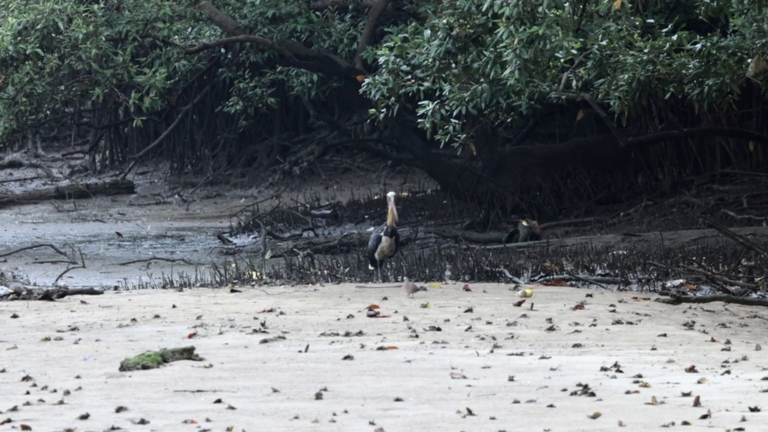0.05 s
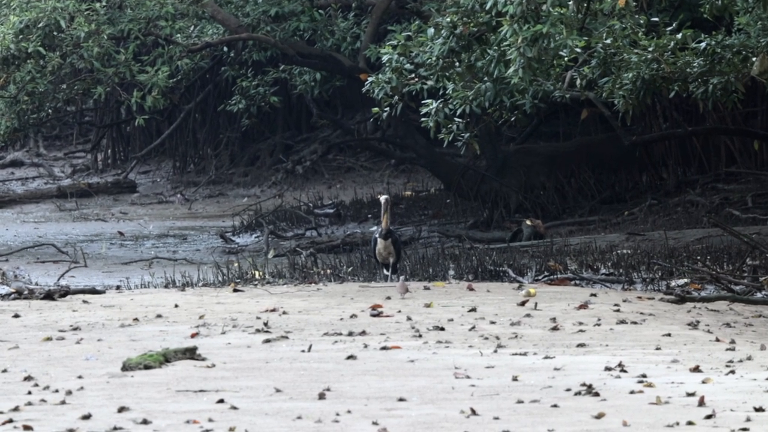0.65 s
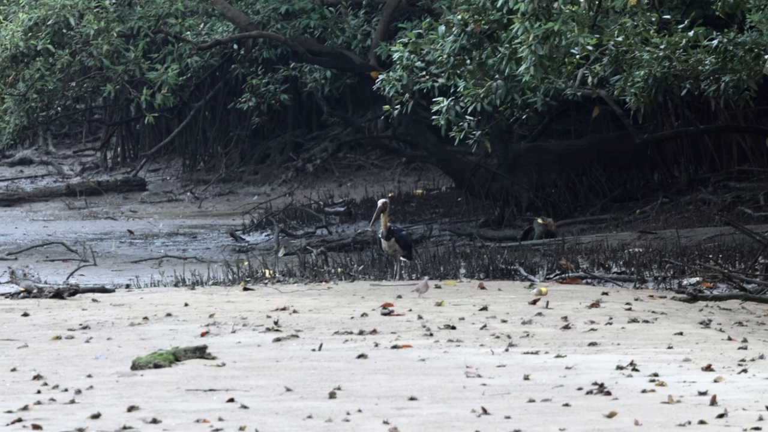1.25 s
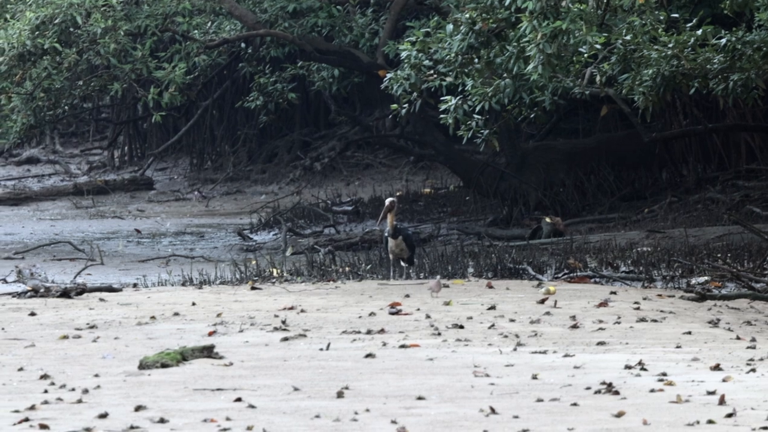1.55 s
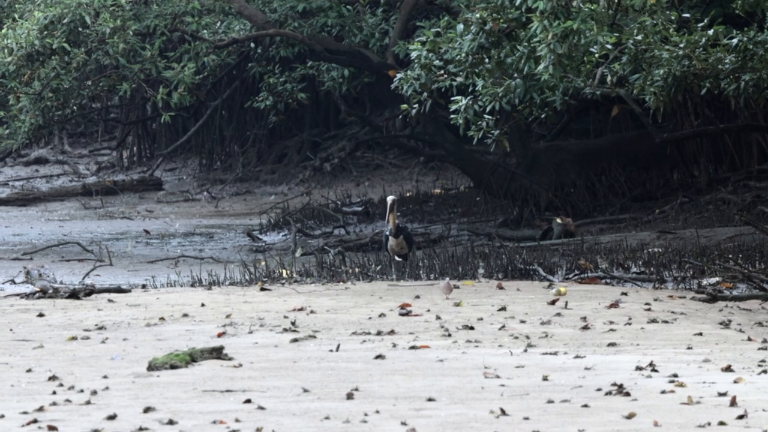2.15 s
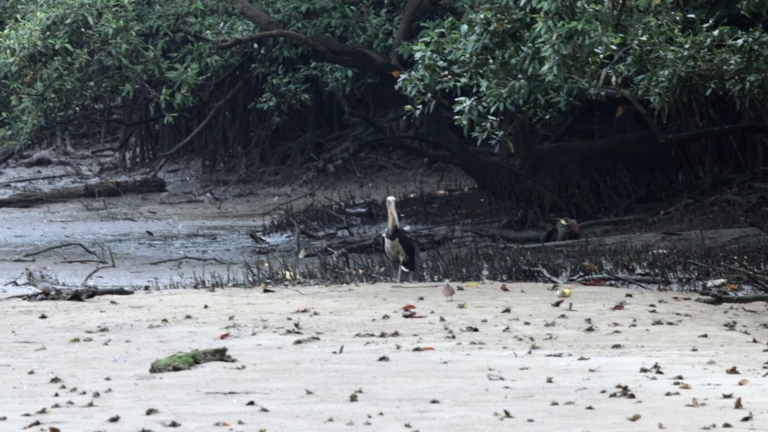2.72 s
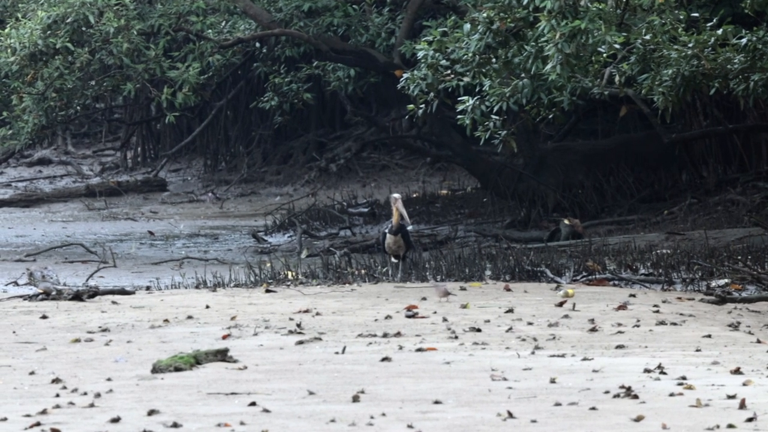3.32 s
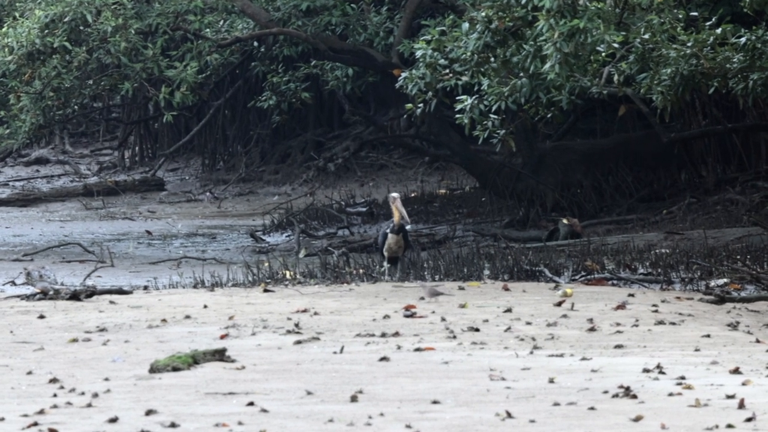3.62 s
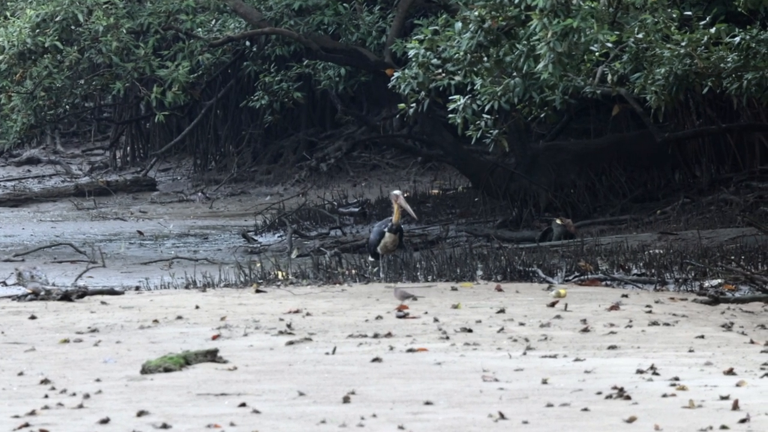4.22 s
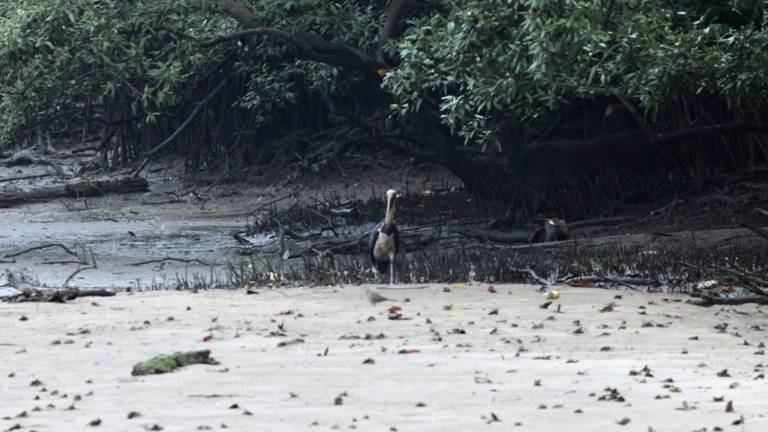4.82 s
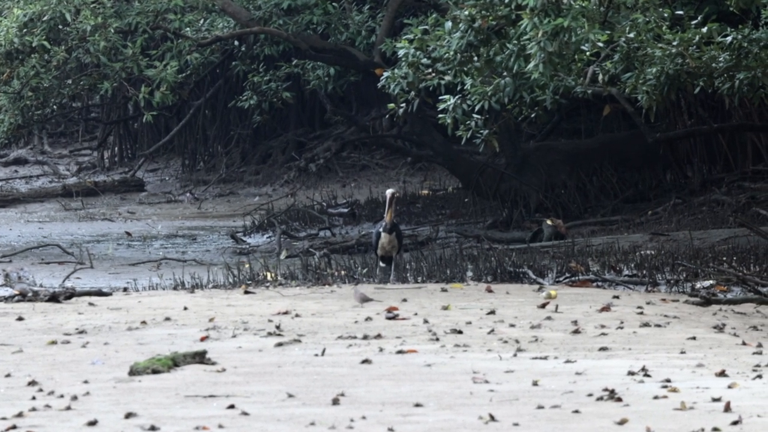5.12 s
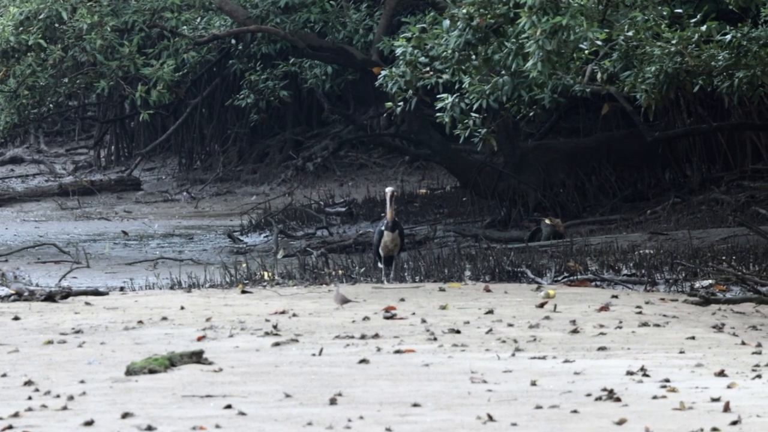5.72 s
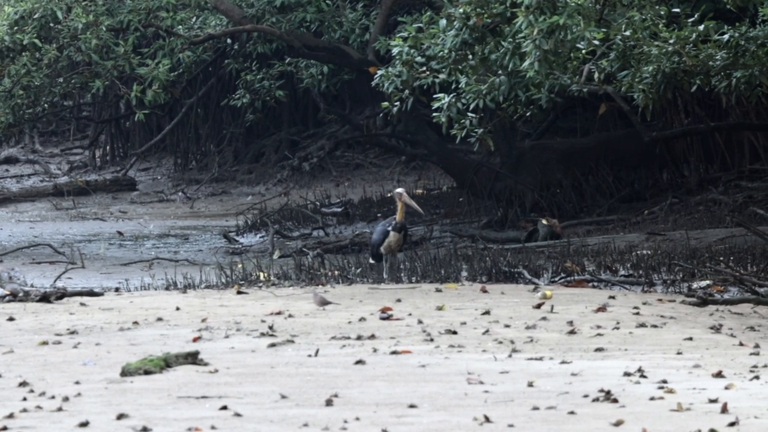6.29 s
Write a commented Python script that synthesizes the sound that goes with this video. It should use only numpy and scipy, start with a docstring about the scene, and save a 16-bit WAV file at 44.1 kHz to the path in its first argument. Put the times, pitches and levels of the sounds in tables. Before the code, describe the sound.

A quiet wooded shore is heard throughout: a soft, low, distant rumble, a light forest hush and a thin, high insect hiss. At about 0.6 and 1.5 seconds a crow caws, by far the loudest sound. Each caw lasts just under half a second, is harsh and rattling, rises slightly and sags at the end, with a short echo from the trees. A dry twig snaps at about 1.2 seconds and again near 3.4, with a few fainter ticks around them. Small birds keep up faint chirps, pips, high twitters and short falling whistles, busiest between 2 and 5 seconds, while farther insects swell and fade softly. One faint falling whistle lingers in the forest at about 4.3 seconds. The crow returns with two more harsh caws at about 5.4 and 6.1 seconds, the last ending near 6.6.

```python
"""Small birds, thin insects and a soft far rumble open the scene; then a crow caws four times.
Each caw is a tone that arches up to about 900 Hz and flutters about 80 times a second. It swoops down
in every pulse of the bird's voice box, so its overtones sweep through the throat's resonances (the
pitches at which the throat rings). Twigs snap, and the trees of this mangrove shore echo the calls."""
import sys
import numpy as np
from scipy import signal
from scipy.fft import rfft, irfft
from scipy.io import wavfile

SR = 44100
rng = np.random.default_rng(int(sys.argv[2]) if len(sys.argv) > 2 else 0)


def master(y):
    """Save y as 16-bit WAV."""
    cut = np.clip(np.atleast_2d(y).T, -1, 1)
    pcm = np.round(cut * 32767)  # scale
    wavfile.write(sys.argv[1], SR, pcm.astype(np.int16))


N = 288855
FOREST_T60_S = 0.87   # time for the forest echo to fade by 60 dB
COLLAPSE_S = .125   # the crow's breath gives out over this last part of a caw


def from_db(db):
    """Turn decibels into a gain."""
    return 10 ** (np.asarray(db) / 20)


def rms_one(x):
    """Scale a sound to an average power of 1."""
    return x / np.sqrt(np.mean(x ** 2) + 1e-20)


def ramp(t, length):
    """Fall from 1 at time 0 to 0 after the given length."""
    return np.clip(1 - t / length, 0, 1)


def response(points, hz):
    """Look up the gain at each frequency on a curve of (frequency, level/dB) points."""
    where, db = np.transpose(points)
    return from_db(np.interp(np.log(hz + 1e-9), np.log(where), db))


def colour(x, points):
    """Shape a sound's lows and highs with such a curve; power 1."""
    gain = response(points, np.fft.rfftfreq(len(x), 1 / SR))
    return rms_one(irfft(rfft(x) * gain, len(x)))


def band(x, low_hz, high_hz, order=2):
    """Keep what lies between two frequencies."""
    sos = signal.butter(order, [low_hz, min(high_hz, SR / 2 - 1)], "band", fs=SR, output="sos")
    return signal.sosfilt(sos, x)


def wander(rate, count):
    """Drift at random, heading for a new value rate times a second."""
    at = np.arange(count) * rate / SR
    steps = int(at[-1]) + 2
    return np.interp(at, np.arange(steps), rng.standard_normal(steps))


def even(x):
    """Hold the power steady over a few pulses, keeping the pulses themselves."""
    window = np.hanning(SR // 22)
    power = signal.fftconvolve(x * x, window / window.sum(), "same")
    return x / np.sqrt(np.abs(power) + 1e-12)


def resonate(x, hz, width_hz):
    """Ring like a hollow space, at a pitch that may move."""
    carrier = np.exp(2j * np.pi * np.cumsum(hz) / SR)
    decay = np.exp(-np.pi * width_hz / SR)
    return 2 * np.real(carrier * signal.lfilter([1 - decay], [1, -decay], x / carrier))


def add(out, start, sound):
    """Mix a sound in at a start time in seconds."""
    i = max(int(start * SR), 0)
    out[i:i + len(sound)] += sound[:N - i]


def trees(x, t60, delay):
    """Countless small echoes from trunks and leaves build up and die away."""
    t = np.arange(SR) / SR
    build_up = 1 - np.exp(-(t / delay) ** 2)
    echoes = rng.standard_normal(SR) * from_db(-60 * t / t60) * build_up
    return signal.fftconvolve(x, echoes / np.linalg.norm(echoes))[:N]


def shore(chorus_half_width_hz=280):
    """Far rumble, forest hush and two insect choruses, all shaped from noise."""
    # tone colours of the three steady sounds: f/Hz, relative level/dB
    rumble_colour = [(15, -35), (25, -30.5), (34, -14.5), (72, -0.5), (118, -1.5), (165, -1), (233, -1.5),
                     (324, -5.5), (382, -10.5), (466, -11.5), (818, -19.5), (1300, -24), (1690, -50.5),
                     (2860, -120)]
    hush_colour = [(900, -29), (1400, 3.5), (2200, 1), (3300, 6.5), (4300, -2.5), (5500, -8), (7000, -4),
                   (8500, -16), (10000, -20.5), (15500, -30)]
    insect_colour = [(6900, -42), (7250, -9.5), (7500, -1), (7850, -3.5), (8050, -5.5), (8300, -36.5)]
    # farther insects swell and fade: t/s, length/s, f/Hz, level/dB at the top of the swell
    swells = [(1.349, 1.08, 4200, -57.5), (2.199, 1.1, 3950, -57.5), (3.0, 1.1, 3980, -55.5),
              (5.052, 1.1, 4200, -62)]
    rumble = from_db(-44 + wander(5.38, N)) * colour(rng.standard_normal(N), rumble_colour)
    hush = from_db(-55 + .5 * wander(5, N)) * colour(rng.standard_normal(N), hush_colour)
    insects = from_db(-56 + .76 * wander(40, N)) * colour(rng.standard_normal(N), insect_colour)
    chorus = np.zeros(N)
    for start, length, hz, db in swells:
        swell = signal.windows.hann(int(length * SR))
        noise = rng.standard_normal(len(swell))
        buzz = rms_one(band(noise, hz - chorus_half_width_hz, hz + chorus_half_width_hz))
        add(chorus, start, from_db(db) * swell * buzz)
    return rumble + hush + insects + chorus


def far_rasps_and_echo(spread=0.052):
    """Distant rasps and one whistle's lingering echo, each a narrow band of noise."""
    # noise bands: t/s, length/s, f/Hz, relative level/dB
    # the long one at 4.3 s, near 2.6 kHz, is the lingering forest echo of a sagging whistle
    noise_bands = [(0, 0.17, 3440, -51), (2.277, 0.15, 4920, -58.5), (2.515, .14, 6200, -64),
                   (2.67, 0.11, 5940, -54), (2.832, 0.24, 4900, -61), (3.099, 0.031, 4850, -49.5),
                   (3.26, .04, 6500, -58), (3.508, 0.18, 4900, -65), (3.662, 0.081, 5970, -60),
                   (3.839, 0.08, 5800, -53), (4.14, 0.061, 6500, -61), (4.307, 0.61, 2630, -58),
                   (5.08, .03, 6100, -53), (5.21, 0.038, 6100, -56)]
    out = np.zeros(N)
    for start, length, hz, db in noise_bands:
        swell = signal.windows.tukey(int(length * SR), .5)
        hiss = band(rng.standard_normal(len(swell)), hz * (1 - spread), hz * (1 + spread))
        add(out, start, from_db(db - 3.5) * rms_one(swell * hiss))
    return out + from_db(-2.5) * trees(out, FOREST_T60_S, delay=0.023)


def twigs(t60=0.012):
    """Each dry snap is a burst of noise that dies almost at once."""
    # snaps: t/s, peak level/dB, f/Hz
    snaps = [(1.205, -32, 3000), (2.051, -46, 9000), (2.917, -50, 8000), (3.373, -42, 5000),
             (3.427, -31.5, 1970)]
    out, t = np.zeros(N), np.arange(SR // 20) / SR
    for start, db, hz in snaps:
        snap = band(rng.standard_normal(len(t)) * from_db(-60 * t / t60), hz / 3, hz * 2)
        add(out, start, from_db(db) * snap / np.abs(snap).max())
    return out


def whistle(length, start_hz, middle_hz, end_hz, waver):
    """A nearly pure tone glides along an arc, swells, fades and flickers through the leaves."""
    progress = np.linspace(0, 1, int(length * SR))
    arc = np.polyval(np.polyfit([0, .5, 1], [start_hz, middle_hz, end_hz], 2), progress)
    pitch = arc * (1 + waver * wander(202.5, len(arc)))
    swell = np.abs(np.sin(np.pi * progress)) ** .5
    flicker = from_db(1.57 * wander(120, len(arc)))
    return rms_one(np.sin(2 * np.pi * np.cumsum(pitch) / SR) * swell * flicker)


def small_birds(pip_hz=1480, pip_s=0.012):
    """Whistles, chirps and pips; the deeper in the trees, the more echo."""
    # notes, one table for each kind: t/s, length/s, middle f/Hz, relative level/dB
    slurs = [(1.0, 0.063, 3150, -47.5), (2.07, .052, 3074, -47), (2.35, .04, 2700, -49),
             (2.91, .052, 2894, -46.5), (3.075, .06, 2945, -48.5), (3.605, .035, 2814, -50.5),
             (4.085, 0.049, 2900, -44.5), (5.075, 0.05, 2970, -48), (6.065, 0.049, 2905, -46.5)]
    flicks = [(2.86, .029, 2340, -48.5), (3.545, 0.029, 2350, -49.5), (6.01, .038, 2400, -53)]
    dips = [(4.025, .036, 1920, -53.5), (5.02, .037, 1940, -54.5)]
    arches = [(.16, 0.069, 2760, -47.5), (.33, .11, 2405, -49), (1.33, .065, 2284, -49.5),
              (5.26, 0.12, 1830, -59)]
    chirps = [(.324, 0.046, 3030, -57), (.45, 0.043, 3050, -59), (.575, .045, 3040, -58),
              (1.19, .045, 3004, -55), (1.32, 0.037, 2970, -59), (1.44, .052, 2980, -57)]
    long_notes = [(1.84, .23, 3280, -55.5), (2.897, 0.14, 3430, -53), (3.88, 0.23, 3270, -57),
                  (4.45, 0.36, 3080, -56), (4.76, .26, 3220, -58), (5.83, .22, 3210, -60)]
    sagging_notes = [(3.585, 0.069, 3240, -48), (3.78, 0.089, 3024, -47), (4.27, .21, 2740, -51.5)]
    thin_falls = [(.08, .059, 6730, -56), (4.5, 0.055, 6900, -53), (4.67, 0.13, 4570, -64)]
    twitters = [(1.18, 0.066, 9360, -62), (1.36, 0.061, 9170, -60), (1.75, 0.062, 9140, -59),
                (1.97, .087, 9110, -60), (2.16, 0.075, 9120, -59.5), (2.36, .088, 9440, -60),
                (2.58, 0.1, 9070, -60), (2.8, 0.057, 8800, -58.5)]
    # short low pips of another bird: t/s, relative level/dB
    pips = [(2.203, -53), (2.2329, -53.5), (2.391, -57), (2.4334, -56), (2.9877, -53), (3.109, -55),
            (3.1497, -55), (3.1712, -55), (3.879, -54), (4.3954, -51), (4.6428, -51.5), (4.788, -56),
            (5.1467, -53)]
    # notes, start and end pitch as multiples of the middle pitch, echo level/dB
    kinds = [(slurs, 1.27, .6, -.42), (flicks, .79, 1.11, -4), (dips, 1.4, 1.57, -8),
             (arches, .98, .84, -7), (chirps, .925, 1.03, -11), (long_notes, .96, 1.012, -1),
             (sagging_notes, 1.1, .94, 1), (thin_falls, 1.1, .86, -3), (twitters, .93, .89, -2.5)]
    direct, far = np.zeros(N), np.zeros(N)
    for notes, first, last, echo_db in kinds:
        waver = .007 + .04 * (first - last) ** 2   # wide sweeps are rougher
        for start, length, hz, db in notes:
            note = from_db(db) * whistle(length, first * hz, hz, last * hz, waver)
            add(direct, start, note / (1 + from_db(2 * echo_db)))
            add(far, start, from_db(echo_db) * note)
    for middle, db in pips:
        pip = whistle(pip_s, pip_hz, pip_hz, pip_hz, waver=0.078)
        add(direct, middle - pip_s / 2, from_db(db + 1.5) * pip)
    near_leaves = from_db(-4.5) * trees(direct, t60=0.041, delay=0.00087)
    return from_db(0.5) * direct + near_leaves + trees(far, FOREST_T60_S, delay=0.0079)


def loudness(t, length, attack, release):
    """A caw's steep rise, gentle arch and final fade, in dB relative to its top."""
    rise_db = -19 * ramp(t, attack) ** 1.53
    arch_db = -6.5 * ((t / length - .56) / .56) ** 2
    fade_db = -16.5 * ramp(length - t, release) ** 1.3
    return rise_db + arch_db + fade_db


def breath(t, length, climb, top_rate, top_hz, throat_hz, slack_rate=69, slack_hz=519.3):
    """Breath pressure climbs, holds and collapses; weak breath makes the voice slow, low and rough."""
    onset, ending = ramp(t, climb), ramp(length - t, COLLAPSE_S)
    slack = onset + ending ** 2.4   # 0 at full pressure
    droop = 1 - .04 * ramp(length - t, length - climb) ** 2   # the air slowly runs out
    rate = droop * (top_rate + (slack_rate - top_rate) * slack)
    tone = droop * (top_hz + (slack_hz - top_hz) * slack)
    throat = throat_hz + 113 * slack - 380 * t   # higher when slack, and sinking with time
    rough = np.clip(.17 + .15 * onset + .75 * ending, 0, 1)
    return rate, tone, throat, rough


def throat_pull(pitch, throat_hz, strength=0.69, reach_hz=257):
    """The pitch clings to half the throat resonance whenever it comes near."""
    gap_hz = throat_hz - 2 * pitch
    return pitch + strength * gap_hz / 2 * np.exp(-(gap_hz / reach_hz) ** 2)


def voice_box(t, length, rate, tone_hz, throat_hz, rough, jitter=.04, quaver=.11):
    """The voice box (syrinx) opens in quick pulses, each a downward swoop with overtones."""
    # one pulse: share of the pulse gone by, pitch as a multiple of the tone, base level/dB
    pulse = [(0, 1.05, -17.5), (.13, 1.1, -7.5), (.3, 1.13, -8.5), (.48, 0.9, -4), (.68, 1.02, -9),
             (.86, 0.84, -3), (1, 0.73, -5)]
    # harmonics (1, 2, 3... times the pitch): relative level/dB
    harmonic_db = [7.5, 0, -1, -8, -7.5, -11, -12.5, -10]
    shares, swoop, levels = np.transpose(pulse)
    cycles = np.cumsum(rate * (1 + jitter * rough * wander(80, len(t)))) / SR
    share = cycles % 1
    pitch = throat_pull(tone_hz * np.interp(share, shares, swoop), throat_hz)
    pitch *= 1 + quaver * rough * wander(500, len(t))
    turns = np.cumsum(pitch) / SR
    turns = turns - turns[np.searchsorted(cycles, np.floor(cycles))]   # each pulse restarts the tone
    # early on it shuts tight between pulses; toward the ragged end they run together
    shut_db = -19.5 * ramp(t, .22) * np.maximum(share - .54, 0)
    pulse_db = np.interp(share, shares, levels) * (1.27 - .72 * rough * t / length)
    flicker_db = -rough * wander(160, len(t))
    opening = from_db(shut_db + pulse_db + flicker_db)
    harmonics = [from_db(db) * opening * np.sin(2 * np.pi * k * turns)
                 for k, db in enumerate(harmonic_db, 1)]
    return pitch, opening, harmonics


def throat(harmonics, pitch, air, throat_hz, rough):
    """The throat and open beak boost some pitches and dull others, in both tone and rushing air."""
    # their tone colour: frequency as a multiple of the throat resonance, level/dB
    curve = [(.25, -6.5), (.35, -34.5), (.44, -6.5), (.52, -2), (.64, -6), (.8, 0), (0.9, -9), (0.999, 9.5),
             (1.072, -2), (1.201, -14.5), (1.4, -36), (1.7, -45.5)]
    tone = sum(wave * response(curve, k * pitch / throat_hz) for k, wave in enumerate(harmonics, 1))
    hiss = colour(air, np.array(curve) * [np.median(throat_hz), 1])
    return rms_one(tone) + from_db(-12) * np.sqrt(rough) * hiss


def beak_rasp(harmonics, air, rasp_colour, beak_hz=4610):
    """High overtones and rushing air make a noisy edge that rings in the open beak."""
    edge = rms_one(sum(harmonics[2:])) + air
    edge = edge + from_db(-3) * resonate(edge, np.full(len(edge), beak_hz), width_hz=180)
    return even(band(colour(edge, rasp_colour), 3130, 16000, order=3))


def caw(row, rasp_colour, rasp_lag_s=0.018):
    """One caw: the pulsing voice sounds through the throat as a low band, a main band and a rasp."""
    _, length, attack, climb, release, top_rate, top_hz, resonance_hz, main_db, low_db, rasp_db = row
    t = np.arange(0, length, 1 / SR)
    rate, tone_hz, throat_hz, rough = breath(t, length, climb, top_rate, top_hz, resonance_hz)
    pitch, opening, harmonics = voice_box(t, length, rate, tone_hz, throat_hz, rough)
    air = rms_one(opening * rng.standard_normal(len(t)))
    voice = throat(harmonics, pitch, air, throat_hz, rough)
    ring = from_db(-2.5) * resonate(voice, throat_hz, width_hz=240)   # lingers after each pulse
    main = even(band(voice + ring, 1338, 2283, order=3))
    low = even(band(voice, 750, 1417, order=3))
    # the bare lowest harmonic comes through as the pitch collapses
    low += from_db(-4) * ramp(length - t, COLLAPSE_S) ** 2 * even(harmonics[0])
    rasp = beak_rasp(harmonics, air, rasp_colour)
    shape_db = loudness(t, length, attack, release)
    late_db = loudness(t - rasp_lag_s, length - rasp_lag_s, attack, release)
    fade = np.clip(np.minimum(t, t[-1] - t) / .016, 0, 1)
    return fade * (from_db(main_db + shape_db) * main
                   + from_db(low_db + .55 * shape_db) * low
                   + from_db(rasp_db + .63 * late_db) * rasp)


def crow():
    """Four caws echo quickly off near branches, brightly off leaves and faintly from the forest."""
    # caws: t/s, length/s, attack/s, pitch climb/s, release/s, pulse rate/Hz, tone f/Hz,
    # throat resonance f/Hz, main level/dB, low level/dB, rasp level/dB
    caws = [(.553, .462, 0.11, .17, 0.057, 81.3, 892, 2048, -19, -29.5, -42.5),
            (1.472, 0.42, .11, .1, 0.07, 80.5, 888, 1981, -20.5, -28.5, -41.5),
            (5.422, .447, 0.078, .16, 0.065, 78.2, 902, 1988, -22, -32.5, -42),
            (6.146, .475, .068, 0.17, 0.054, 79.6, 874, 1910, -20.5, -28, -41.5)]
    # tone colour of the rasp, one curve for each caw: f/Hz, relative level/dB
    rasp_colours = [
        [(1590, -32), (2700, 0.5), (2780, -10), (3170, -2.5), (3750, -11), (4640, -6), (5410, -4), (5730, -4.5),
         (7630, -8.5), (8570, -19), (13800, -24.5), (15500, -38.5)],
        [(1590, -34), (2700, -2), (2780, -22), (3100, -0.5), (3340, -24), (3510, -7), (4070, -11.5), (4540, -3),
         (5100, -10), (6830, -9), (8510, -20.5), (15500, -31)],
        [(1590, -30), (2700, -4), (3220, -12.5), (3310, -10), (3540, -10), (4710, -6.5), (5250, -13.5),
         (6780, -11), (7850, -20), (8760, -24), (12800, -29.5), (15500, -35)],
        [(1590, -36), (2700, -0.5), (3340, -11), (4570, -4.5), (5860, -11.5), (6880, -4), (8090, -17),
         (8640, -21), (9850, -20), (11200, -28), (13100, -20), (15500, -37)],
    ]
    out = np.zeros(N)
    for row, rasp_colour in zip(caws, rasp_colours):
        add(out, row[0], caw(row, rasp_colour))
    leaves = band(trees(out, t60=.4, delay=.013), 3600, 15000, order=3)
    forest = band(trees(out, t60=1.08, delay=.015), 1100, 7000, order=1)
    branches = trees(out, t60=.07, delay=.0018)
    return out + from_db(-12) * branches + from_db(-4.5) * leaves + from_db(-17) * forest


def scene():
    """Everything heard on the shore, mixed into one channel."""
    return (crow() + small_birds() + far_rasps_and_echo() + twigs() + shore())[None]


def record(dry, cutoff_hz=15700):
    """Cut off the very highest treble steeply."""
    return signal.sosfilt(signal.ellip(10, .1, 80, cutoff_hz, fs=SR, output="sos"), dry)


dry = scene()
out = record(dry)
master(out)
```